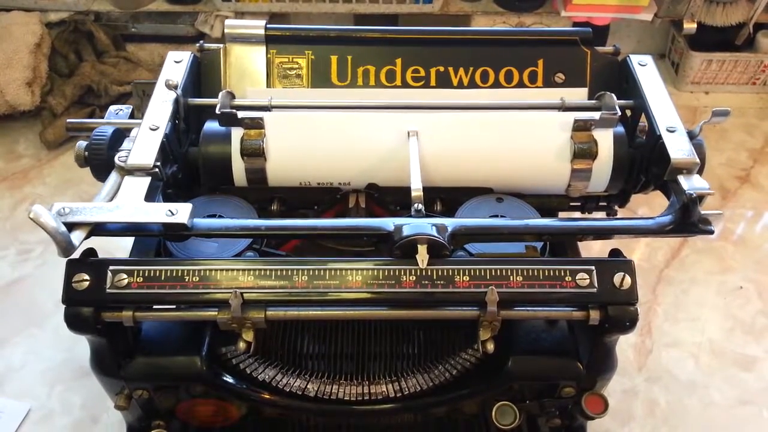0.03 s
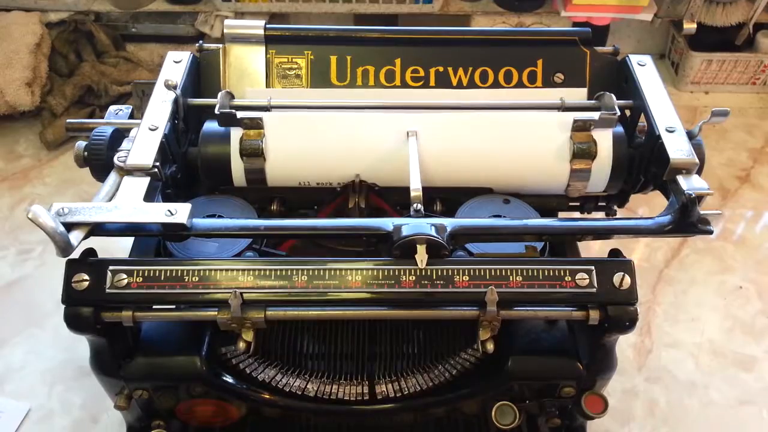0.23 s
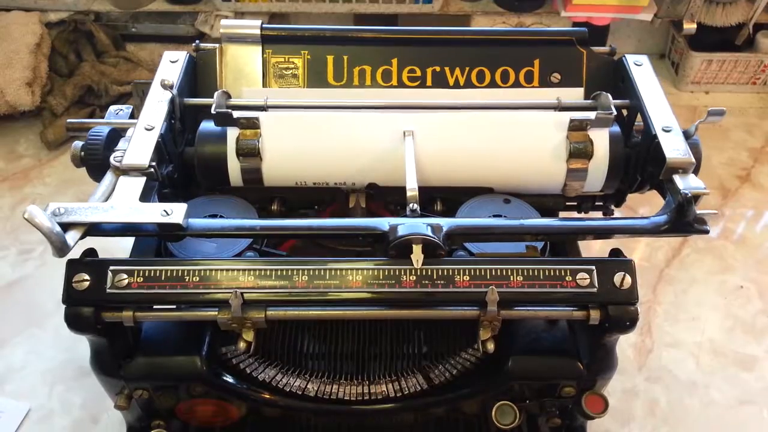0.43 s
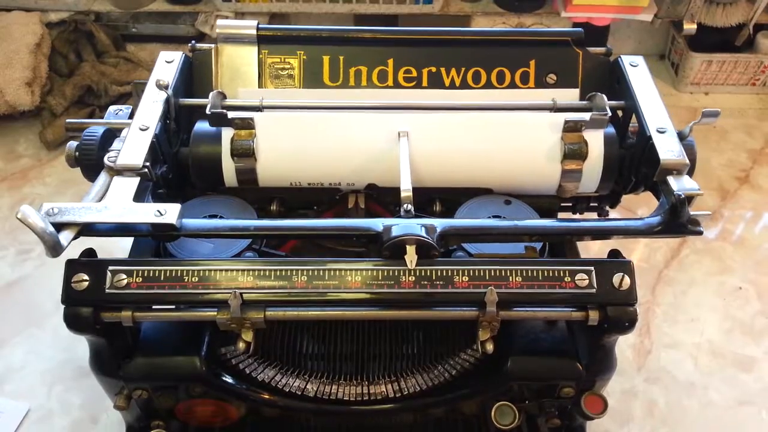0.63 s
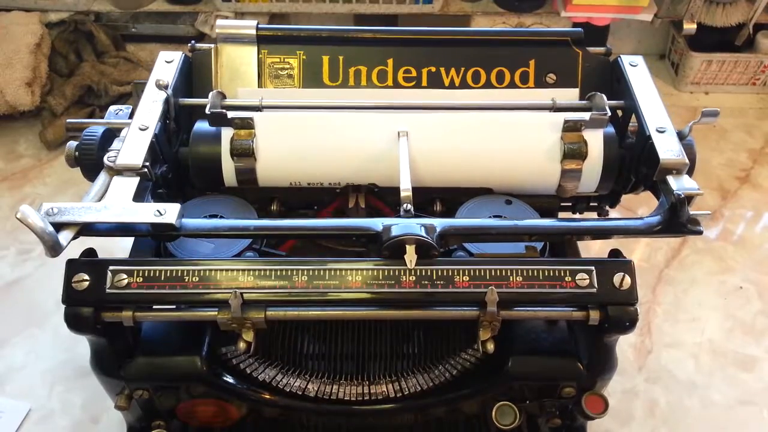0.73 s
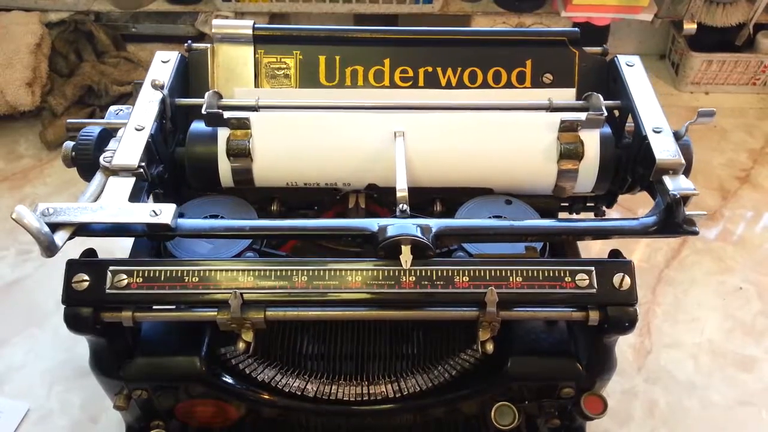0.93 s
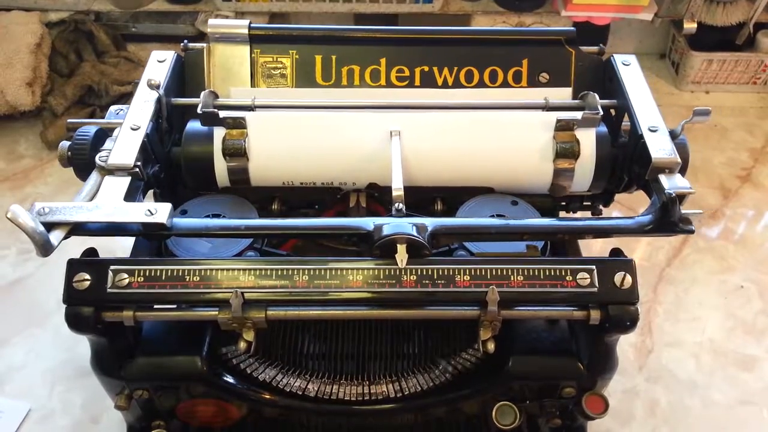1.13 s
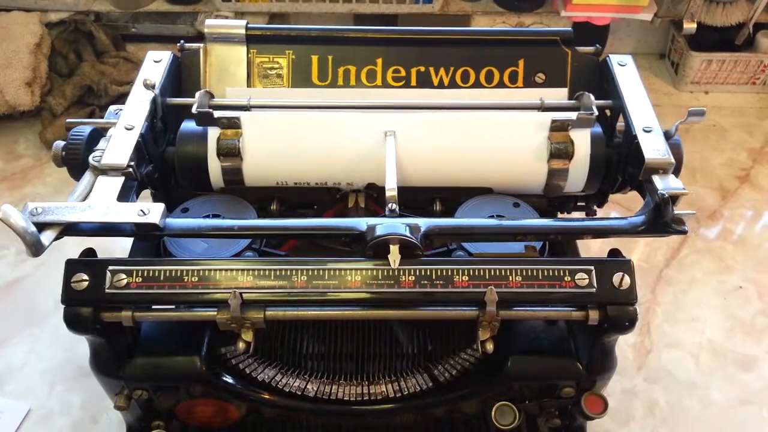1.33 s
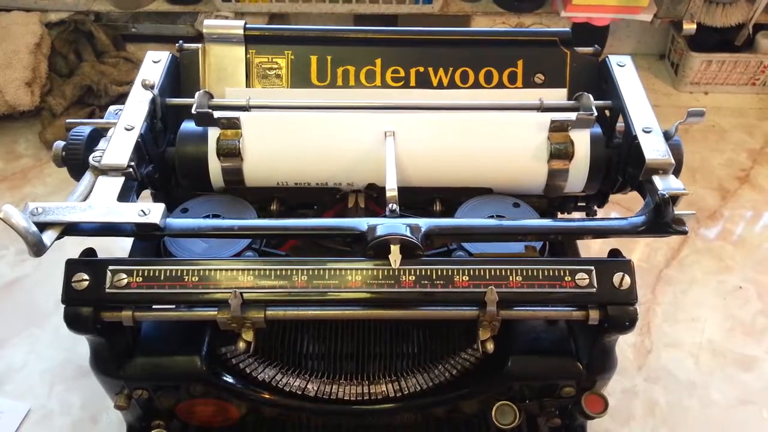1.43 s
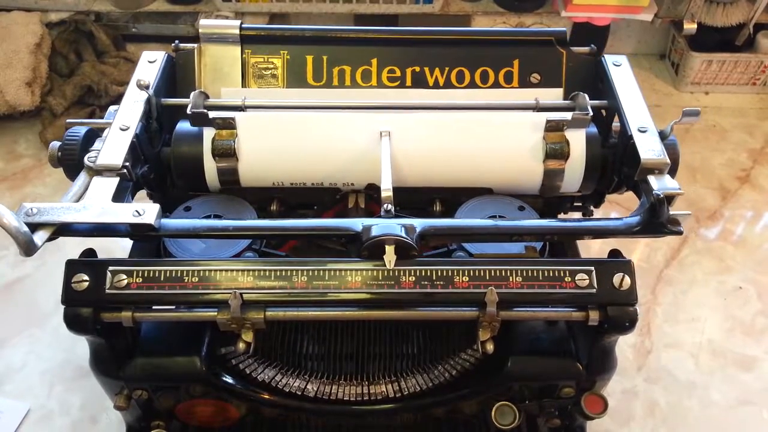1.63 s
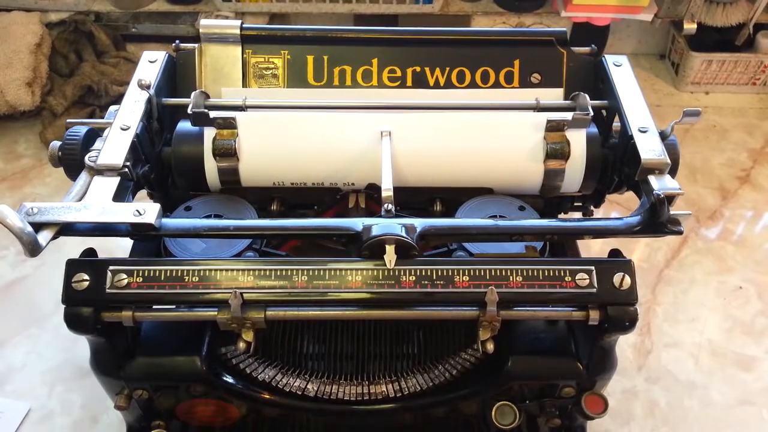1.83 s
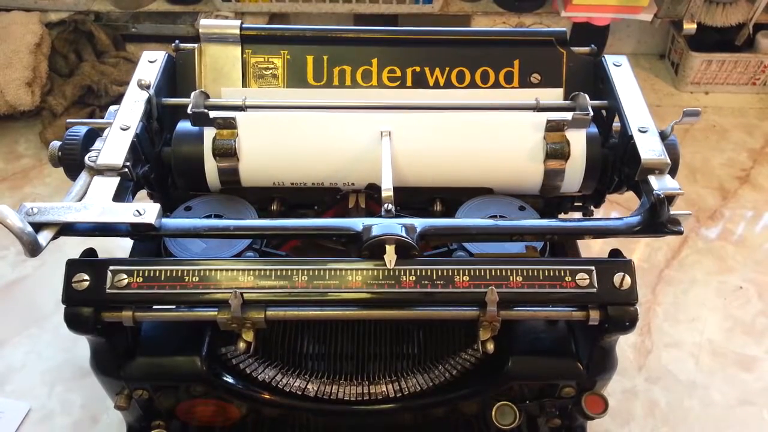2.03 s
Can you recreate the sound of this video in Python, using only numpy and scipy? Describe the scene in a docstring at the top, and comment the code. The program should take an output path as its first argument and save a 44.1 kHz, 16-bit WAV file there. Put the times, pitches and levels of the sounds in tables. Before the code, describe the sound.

Manual typewriter keys strike paper in two short groups, with sharp clacks and lighter mechanical clicks.

```python
"""A room hums; then, close by, five letters are struck on a manual typewriter, two and then three.
In each stroke the key ticks, the linkage trips the escapement, the type slaps the paper and rings the
frame, the typebar drops back and the carriage steps on. Each impact excites noise and damped modes.
The space bar is tapped between the words, loose levers rattle and the desk carries soft thuds.
The room reverberates briefly, and the slaps overload the recorder."""
import sys
import numpy as np
from scipy import signal
from scipy.fft import rfft, irfft
from scipy.io import wavfile
from scipy.ndimage import uniform_filter1d

SR = 44100
rng = np.random.default_rng(int(sys.argv[2]) if len(sys.argv) > 2 else 0)


def generate_wav(sig):
    """Save sig (samples, or channels by samples) to the path in sys.argv[1] as 16-bit PCM at SR."""
    pcm = np.round(np.clip(np.atleast_2d(sig).T, -1, 1) * 32767).astype(np.int16)
    wavfile.write(sys.argv[1], SR, pcm)


N = 92610
RING_S, SNAP_T60_S = 0.4, 0.018  # length of an impact sound; decay time of its first snap
RING_T = np.arange(0, RING_S, 1 / SR)

# Levels are relative within each table; the functions set the gains.
# hum of the room (f/Hz, level/dB)
HUM_PARTIALS = [(98, -58.5), (146, -50.5), (211, -46.5), (254, -42), (382, -50.5)]
# finger meets key; linkage trips escapement; space bar and levers rattle (t/s, level/dB, rise/s)
KEY_TICKS = [(0.209, -3, 0.00077), (0.463, 7, 0.004), (0.769, 0, 0.0018), (1.0181, 5.5, 0.0015),
             (1.266, 7.5, 0.0032), (1.532, 4, 0.0013), (1.806, -6.5, .002)]
ESCAPEMENT_TRIPS = [(0.238, -10, 0.0056), (0.4945, -6.5, 0.00039), (1.0488, -7.5, 0.0052),
                    (1.297, -5, 0.006), (1.567, -10, .004)]
LEVER_RATTLES = [(0.342, -1, 0.0024), (0.779, 0, 0.0022), (0.888, -3.5, 0.0047), (0.927, -3, 0.0051),
                 (0.958, -9, 0.0037), (1.122, 3, 0.0037), (1.655, -3.5, 0.0035)]
# type strikes platen
# (t/s, level/dB, clatter/dB, frequency ratio, left-right/dB, rebound delay/s, rebound/dB)
TYPE_SLAPS = [(0.251, -5.5, 3, 1.02, 6.5, 0.0014, -12), (0.503, -2, 1, 0.97, 1, 0.0044, 1),
              (1.0602, -3, 2, 1.0, 0, .002, -7), (1.3078, 1.5, -6, 1.029, -2.5, 0.0036, -1),
              (1.5742, 1, 3, 1.015, -4, .005, -2)]
# thuds through the desk (t/s, level/dB)
DESK_THUDS = [(0.265, -6), (0.386, 12), (0.423, 14), (0.461, 10), (0.56, 0), (0.64, -19), (0.921, 3.5),
              (1.16, 7), (1.391, 9), (1.691, 5), (1.83, -3)]
# typebar lands on its rest (t/s, level/dB, bounce delay/s, bounce/dB)
TYPEBAR_DROPS = [(0.353, -3, 0.018, -8), (0.599, -5, .009, -6), (1.1355, -2, 0.0082, -5.5),
                 (1.385, -4, 0.0073, -15), (1.6679, -4.5, 0.014, -6)]
# carriage steps and stops (t/s, level/dB, rise/s, knock/dB)
CARRIAGE_STEPS = [(0.39, 5, 0.0028, -35), (0.640, -2, 0.0023, -47.5), (1.178, 2, 0.0024, -43),
                  (1.428, -0.5, 0.0011, -53), (1.7117, -1, 0.0035, -52)]
# space bar springs back (t/s, level/dB)
SPACE_BAR_RETURN = (0.9035, -24.5)
# modes of the steel frame (f/Hz, level/dB, T60/s)
FRAME_MODES = [(573, -5.5, 0.28), (735, 15, 0.055), (1270, -10, 0.23), (1480, -1, 0.16), (1720, 5, 0.16),
               (2040, 11.5, 0.073), (2105, 12.5, 0.04), (2282, 8, 0.13), (2550, -29, .06), (2880, 2, .06),
               (3200, -19, .06), (4250, -12, .1), (4700, 9, 0.062), (7360, -22, .09)]
# modes that each impact scales by a frequency ratio (nominal f/Hz, level/dB, T60/s)
PLATEN_MODES = [(604, -16.5, .03), (714, -14, 0.019), (1094, -15, .012), (1262, -8, 0.016),
                (1656, -4.5, .011), (1839, 0.5, 0.011), (2115, -3, 0.0088), (2440, -14.5, 0.0079),
                (3070, -6, 0.0061), (4400, -15, 0.014), (4800, -12.5, .012), (7400, -39, 0.0031)]
DESK_MODES = [(62.6, -55, 0.22), (77, -44, 0.12), (96.1, -41, 0.37), (154.6, -46, 0.095)]
TYPEBAR_MODES = [(1530, -8, .03), (2943, -2.5, 0.054), (3086, 2.5, 0.025), (4620, -4, 0.03)]
CARRIAGE_MODES = [(220, -14, 0.092), (386, 9.5, 0.2), (448, 1, 0.14), (591, 15.5, 0.048)]
# spectral densities of the room noise, the contacts and the wall reflections (f/Hz, level/dB)
AIR_SPECTRUM = [(25, -48), (40, -34), (60, -18), (120, -14), (170, -12), (210, -6), (260, -3), (335, -7),
                (480, -3.5), (640, -12), (900, -13.5), (1250, -19), (2200, -21), (3800, -26.5), (6000, -31),
                (9000, -34.5), (12000, -38), (15000, -46)]
KEY_SPECTRUM = [(100, 18), (500, 15), (1500, -1), (3500, 8), (6000, 5), (9000, 3.5), (14500, -0.5)]
TRIP_SPECTRUM = [(100, -9), (500, -2), (1500, 2.5), (3000, 2.5), (5500, -2.5), (9000, -2), (14500, -10)]
PAPER_SPECTRUM = [(100, -40), (900, -14), (1700, -9), (2600, 3), (3800, -5), (4600, -4), (6000, 1),
                  (8000, -7), (10500, -11), (14500, -10)]
CLATTER_SPECTRUM = [(100, -24), (400, -10), (650, -5.5), (950, -7), (1350, 0), (1850, 0), (2600, -2.5),
                    (3700, -4.5), (5200, -2), (6300, -6.5), (8000, -8), (10500, -14), (14500, -16.5)]
RATTLE_SPECTRUM = [(100, -2), (500, 0), (1500, -4.5), (3000, -2.5), (5000, -8.5), (8000, -10),
                   (14500, -17.5)]
REST_SPECTRUM = [(100, 3), (500, -2.5), (1000, -4), (1550, 2.5), (2200, -5), (3000, 4), (3700, -4.5),
                 (5000, -2), (6500, -6.5), (14500, -13)]
STOP_SPECTRUM = [(100, -7), (400, -12), (950, 2), (1600, 7.5), (2100, 5.5), (3700, -0.5), (5200, 1.5),
                 (6200, -3.5), (8000, -2), (14500, -12.5)]
WALL_SPECTRUM = [(100, -11), (500, -8), (1000, 2.5), (1800, 0.5), (3000, 6), (5200, 1.5), (8000, 1.5),
                 (15000, 13.5)]
# left-right correlation of room noise, paper crack, and clatter and reflections (f/Hz, coefficient)
AIR_CORRELATION = [(30, 0.27), (100, 0.96), (300, 0.84), (600, 0.36), (1200, 0.15), (3000, 0.095),
                   (15000, 0.033)]
PAPER_CORRELATION = [(200, 1), (1700, 0.63), (2800, 0.66), (5000, -0.13), (14000, -0.27)]
DIFFUSE_CORRELATION = [(200, 1), (700, .55), (1500, 0.016), (2800, 0.0099), (5000, -0.22), (14000, 0.26)]
# balance of the machine between the sides (f/Hz, left-right/dB)
MACHINE_BALANCE = [(100, 3), (500, 0), (950, -1.5), (1900, 1), (3700, 3.5), (7500, 0.5), (15000, 3.5)]
# reverberation time of the room (f/Hz, T60/s)
ROOM_DECAY = [(100, 0.19), (500, 0.93), (2000, 0.33), (5000, 0.43), (10000, 0.4), (15000, 0.15)]


def amp(db):
    """Amplitude ratio of a level in decibels."""
    return 10 ** (np.asarray(db) / 20)


def unit(x):
    """Normalisation to an rms of 1."""
    return x / np.sqrt(np.mean(x ** 2) + 1e-20)


def curve(points, hz):
    """Interpolation on a logarithmic frequency axis."""
    f, value = np.transpose(points)
    return np.interp(np.log(hz + 1), np.log(f), value)


def add(mix, s, sound):
    """Superposition: a sound joins the mix at time s."""
    part = mix[:, round(s * SR):][:, :sound.shape[-1]]
    part += sound[..., :part.shape[1]]


def highpass(order, hz):
    """Butterworth filter sections that attenuate below a cutoff."""
    return signal.butter(order, hz, "high", fs=SR, output="sos")


def noise(spectrum, correlation, size):
    """Partial coherence: the two sides share part of a coloured noise."""
    hz = np.fft.rfftfreq(size, 1 / SR)
    left, independent = rfft(rng.standard_normal((2, size)))
    shared = np.clip(curve(correlation, hz), -1, 1)
    right = shared * left + np.sqrt(1 - shared ** 2) * independent
    return unit(irfft(np.array([left, right]) * amp(curve(spectrum, hz)), size))


def onset(rise_s):
    """Linear growth to full amplitude."""
    return np.minimum(RING_T / rise_s, 1)


def decay(t60, db=0):
    """Exponential damping: the level falls from db by 60 dB in t60 seconds."""
    return amp(db - 60 * RING_T / t60)


def modes(table, ratio, spread_rad):
    """Free vibration: a sum of damped sines, each reaching the two sides with a small random phase offset."""
    ring = 0
    for hz, db, t60 in table:
        phase = spread_rad * (2 * rng.random((2, 1)) - 1)
        ring = ring + decay(t60, db) * np.sin(2 * np.pi * hz * ratio * RING_T + phase)
    return ring


def clatter(spectrum, rise_s, t60, snap_db, ring_db):
    """Repeated impact: metal parts snap together, chatter and excite the modes of the frame."""
    roughness = unit(uniform_filter1d(rng.standard_normal(len(RING_T)), size=40))
    contacts = unit(amp(1.3 * np.clip(roughness, -2, 2)))
    envelope = decay(t60) + decay(SNAP_T60_S, snap_db)
    chatter = noise(spectrum, DIFFUSE_CORRELATION, len(RING_T)) * contacts * envelope
    frame = amp(ring_db) * rng.choice([-1, 1]) * modes(FRAME_MODES, 1, spread_rad=0.74)
    return onset(rise_s) * (chatter + frame)


def room_hum():
    """Random modulation: partials waver in amplitude and frequency over a steady low rush."""
    t = np.arange(N) / SR
    hum, rates_hz = 0, np.geomspace(0.7, 11, 20)
    for hz, db in HUM_PARTIALS:
        waver = unit(sum(np.sin(2 * np.pi * (f * t + rng.random())) for f in rates_hz))
        phase = 2 * np.pi * np.cumsum(hz + 3.17 * waver[::-1]) / SR
        hum = hum + amp(db) * unit((1 + 0.91 * waver) * np.sin(phase))
    return hum + amp(-32) * noise(AIR_SPECTRUM, AIR_CORRELATION, N)


def keys(mix):
    """Light impact: a finger meets a key with a thin tick that barely excites the frame."""
    for s, db, rise in KEY_TICKS:
        add(mix, s, amp(db - 29) * clatter(KEY_SPECTRUM, rise, t60=0.087, snap_db=-6.5, ring_db=-49))


def escapement(mix):
    """Transmitted force: the linkage trips the escapement with a click just before each slap."""
    for s, db, rise in ESCAPEMENT_TRIPS:
        click = clatter(TRIP_SPECTRUM, rise, t60=0.087, snap_db=-27, ring_db=-23.5)
        add(mix, s, amp(db - 9.5) * click)


def type_slaps(mix):
    """Impulsive excitation: type cracks on the paper, rings the platen, rebounds and shakes the frame."""
    slaps = np.zeros((2, N))
    for s, db, clatter_db, ratio, balance_db, delay, rebound_db in TYPE_SLAPS:
        crack = noise(PAPER_SPECTRUM, PAPER_CORRELATION, len(RING_T)) * decay(t60=0.015, db=-3.5)
        blow = onset(0.00031) * (modes(PLATEN_MODES, ratio, spread_rad=0.73) + crack)
        rebound = clatter(CLATTER_SPECTRUM, rise_s=0.00054, t60=0.022, snap_db=-6, ring_db=-25)
        shake = clatter(CLATTER_SPECTRUM, rise_s=0.0014, t60=0.12, snap_db=-5, ring_db=-19)
        add(slaps, s, amp(db) * sides(balance_db) * blow)
        add(slaps, s + delay, amp(rebound_db - 10) * sides(1.4) * rebound)
        add(slaps, s, amp(clatter_db - 17) * shake)
    mix += signal.sosfilt(highpass(3, hz=340), slaps)


def desk_thuds():
    """Structure-borne sound: the moving keys and carriage softly excite the low modes of the desk."""
    thuds = np.zeros((2, N))
    for s, db in DESK_THUDS:
        ring = modes(DESK_MODES, ratio=rng.uniform(0.96, 1.04), spread_rad=0.1)
        add(thuds, s, amp(db) * onset(0.036) * ring)
    return thuds


def loose_levers(mix):
    """Intermittent contact: the space bar and loose levers rattle."""
    for s, db, rise in LEVER_RATTLES:
        rattle = clatter(RATTLE_SPECTRUM, rise, t60=0.17, snap_db=-4, ring_db=-39)
        add(mix, s, amp(db - 28.5) * rattle)


def typebars(mix):
    """Inelastic collision: a typebar drops on its rest, pings and bounces once, more weakly."""
    for s, db, bounce_s, bounce_db in TYPEBAR_DROPS:
        for delay, drop_db in (0, 0), (bounce_s, bounce_db):
            contact = clatter(REST_SPECTRUM, rise_s=0.0012, t60=0.19, snap_db=0.5, ring_db=-24.5)
            ping = amp(1) * modes(TYPEBAR_MODES, ratio=0.99, spread_rad=1)
            add(mix, s + delay, amp(db + drop_db - 23) * (contact + ping))


def carriage(mix):
    """Sudden deceleration: the carriage hits its stop and its modes give a hollow knock."""
    for s, db, rise, knock_db in CARRIAGE_STEPS:
        add(mix, s, amp(db - 21) * clatter(STOP_SPECTRUM, rise, t60=0.089, snap_db=1, ring_db=-21))
        add(mix, s, amp(knock_db) * modes(CARRIAGE_MODES, ratio=0.93, spread_rad=0.32))


def space_bar(mix):
    """Restoring force: the space bar springs back against its stop."""
    s, db = SPACE_BAR_RETURN
    add(mix, s, amp(db - 4) * clatter(STOP_SPECTRUM, rise_s=0.001, t60=0.2, snap_db=-8, ring_db=-19))


def sides(balance_db):
    """Level difference: left and right gains that place a sound to one side."""
    return amp(np.vstack([balance_db, -balance_db]) / 2)


def reverberation(direct):
    """Diffuse reflection: convolution with a noise tail whose bands decay at their own rates."""
    hz, t, bands = signal.stft(noise(WALL_SPECTRUM, DIFFUSE_CORRELATION, SR // 2), SR, nperseg=256)
    damping = amp(-60 * t / curve(ROOM_DECAY, hz)[:, None])
    _, tail = signal.istft(bands * damping, SR, nperseg=256)
    tail_t = np.arange(tail.shape[1]) / SR
    tail *= np.clip((tail_t - 0.004) / 0.0035, 0, 1)  # reflections begin after 4 ms
    return signal.fftconvolve(direct, tail / np.linalg.norm(tail[0]), axes=1)[:, :N]


def scene():
    """Superposition of the hum, the machine balanced by frequency, its reverberation and the desk."""
    hum, machine = room_hum(), np.zeros((2, N))
    for mechanism in keys, escapement, type_slaps, loose_levers, typebars, carriage, space_bar:
        mechanism(machine)
    balance_db = curve(MACHINE_BALANCE, np.fft.rfftfreq(N, 1 / SR))
    direct = irfft(rfft(machine) * sides(balance_db), N)
    return hum + direct + amp(-11) * reverberation(direct) + desk_thuds()


def record(dry):
    """Nonlinear distortion: the slaps clip, adding grit but no bass; filters then limit the band."""
    grit = np.clip(dry, -0.95, 0.95) - dry
    clipped = dry + signal.sosfiltfilt(highpass(2, hz=450), grit)
    lowpass = signal.firwin(401, cutoff=14950, window=("kaiser", 8), fs=SR)[None]
    return signal.oaconvolve(signal.sosfilt(highpass(4, hz=45), clipped), lowpass, "same")


dry = scene()
out = record(dry)
generate_wav(out)
```